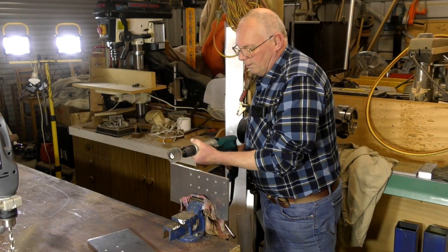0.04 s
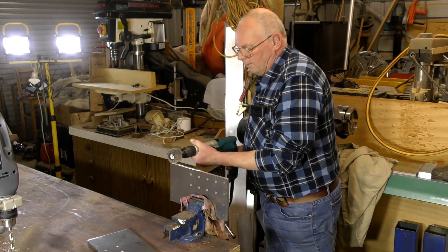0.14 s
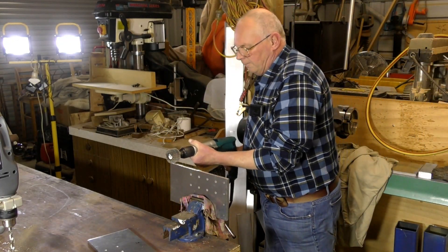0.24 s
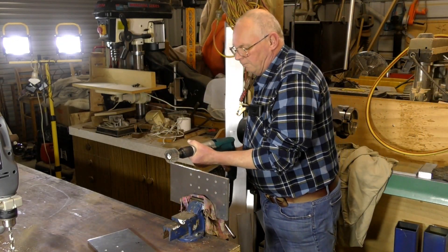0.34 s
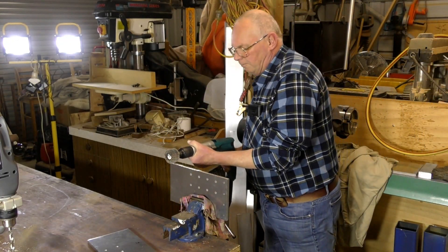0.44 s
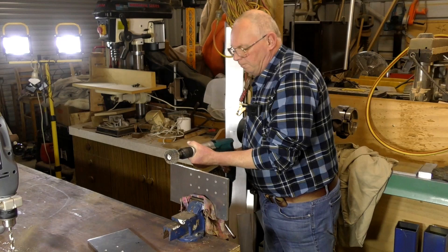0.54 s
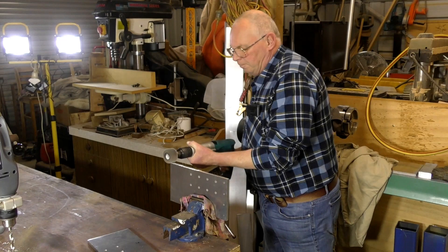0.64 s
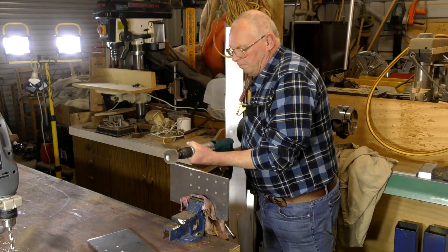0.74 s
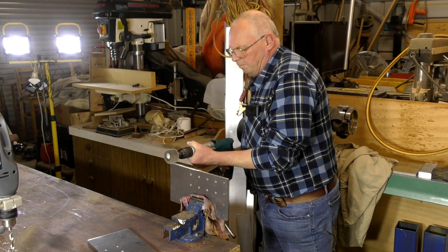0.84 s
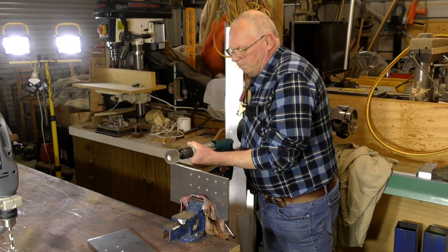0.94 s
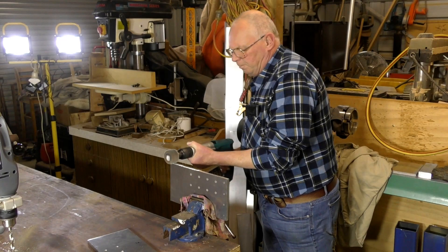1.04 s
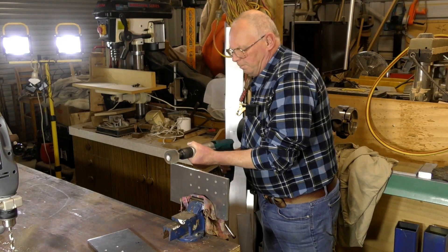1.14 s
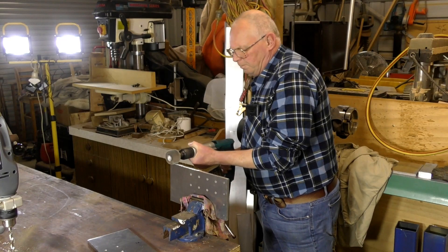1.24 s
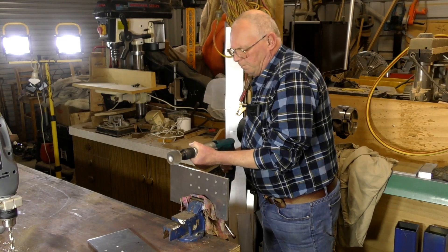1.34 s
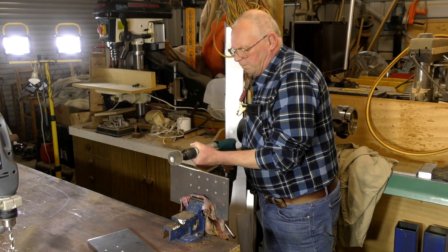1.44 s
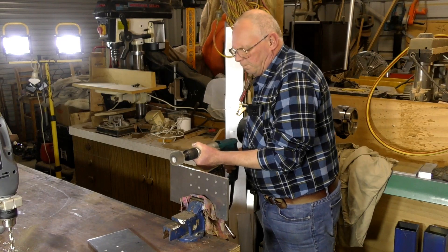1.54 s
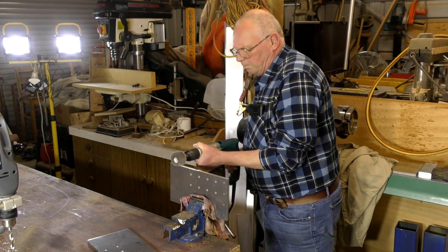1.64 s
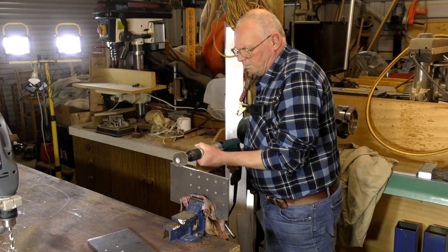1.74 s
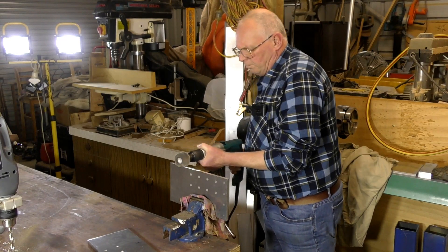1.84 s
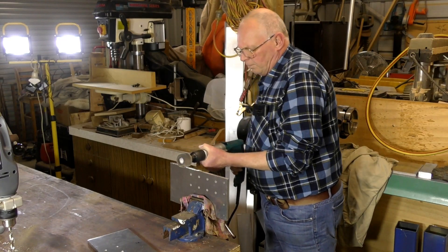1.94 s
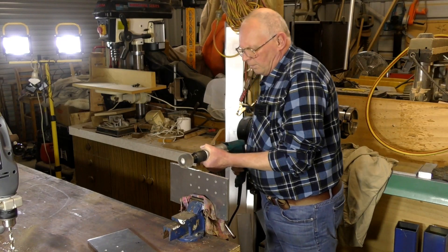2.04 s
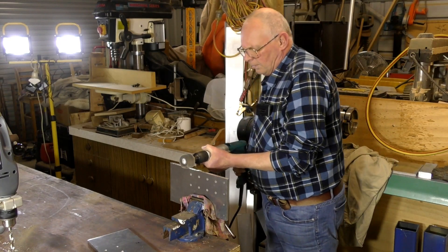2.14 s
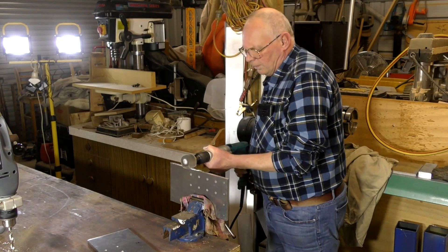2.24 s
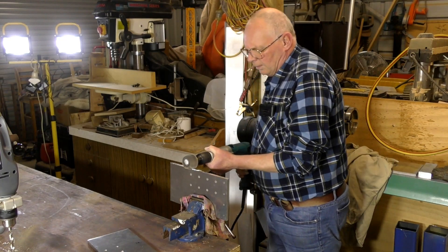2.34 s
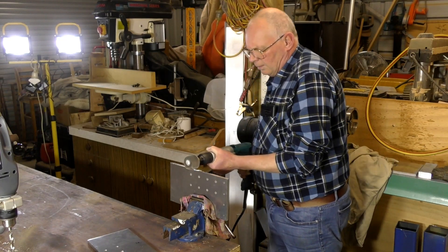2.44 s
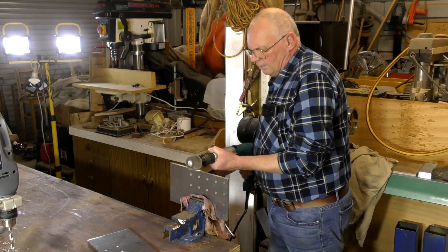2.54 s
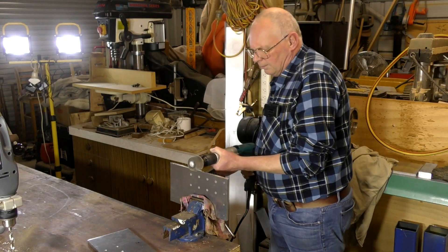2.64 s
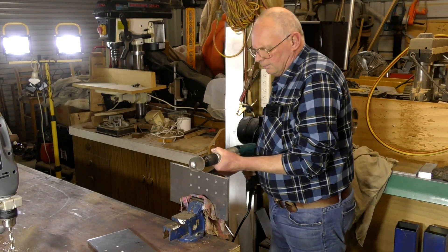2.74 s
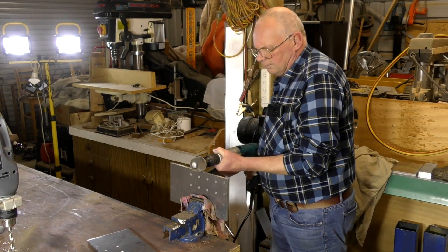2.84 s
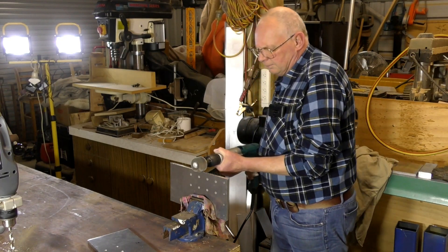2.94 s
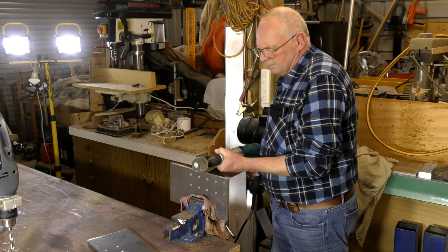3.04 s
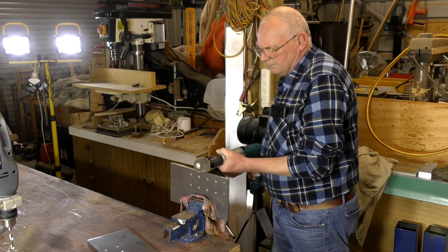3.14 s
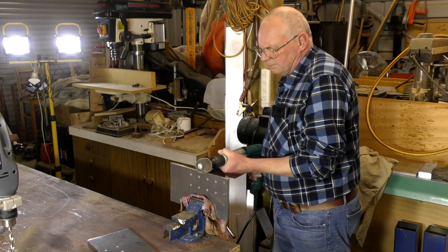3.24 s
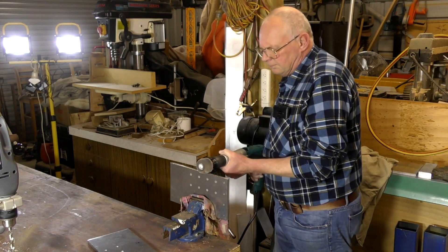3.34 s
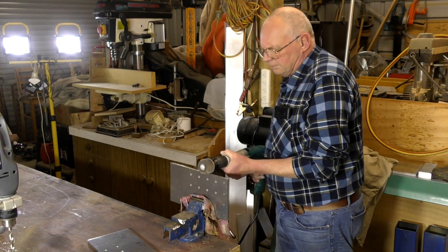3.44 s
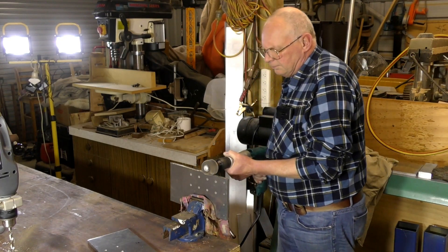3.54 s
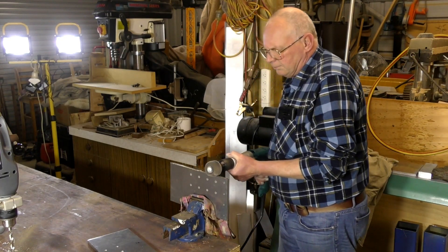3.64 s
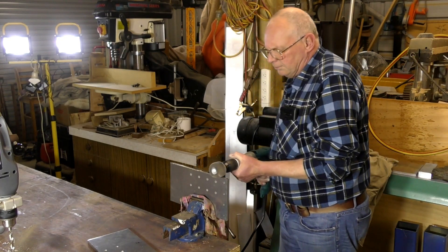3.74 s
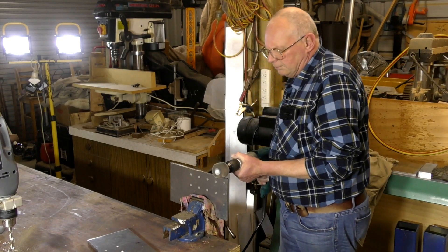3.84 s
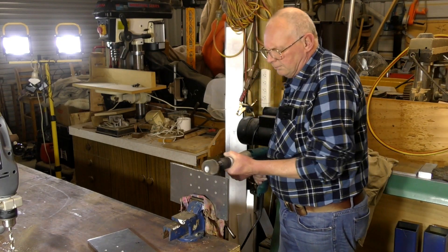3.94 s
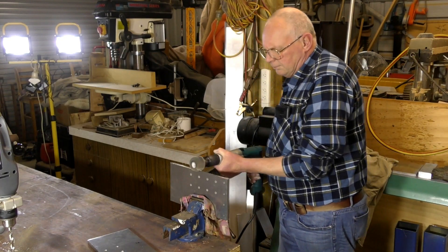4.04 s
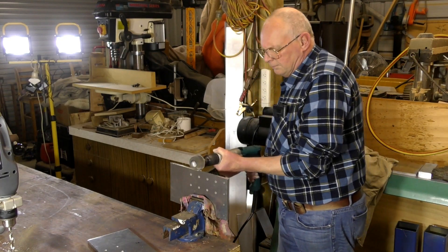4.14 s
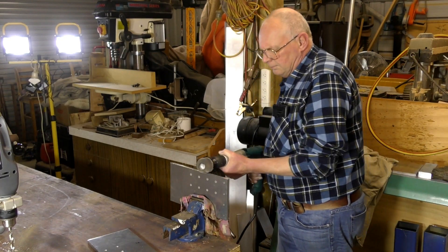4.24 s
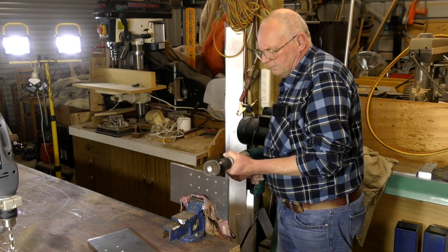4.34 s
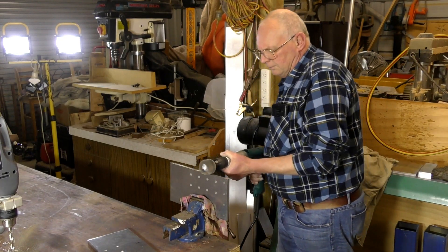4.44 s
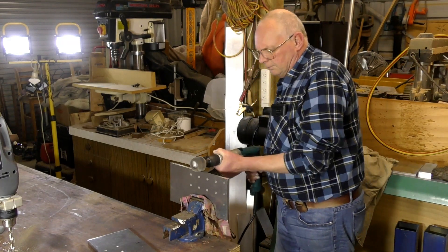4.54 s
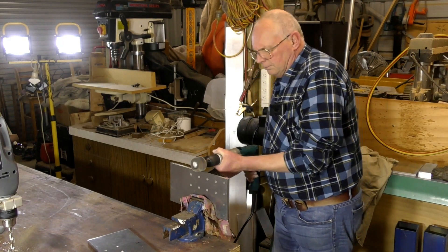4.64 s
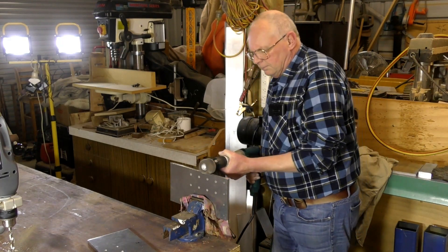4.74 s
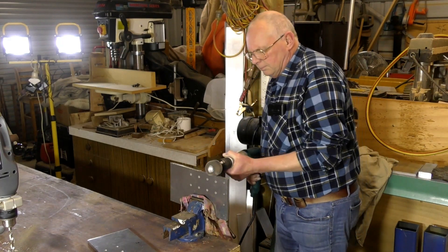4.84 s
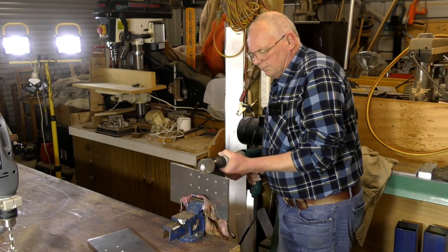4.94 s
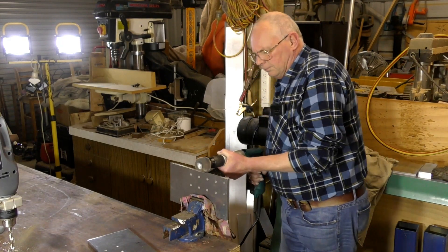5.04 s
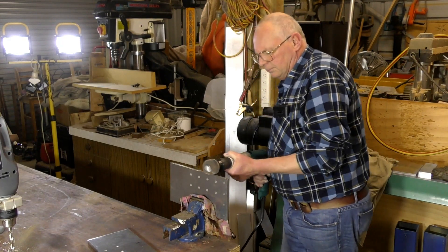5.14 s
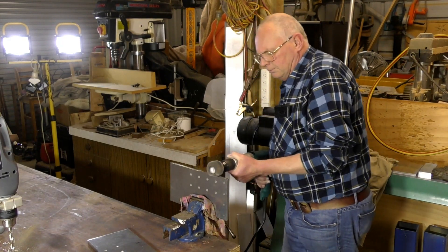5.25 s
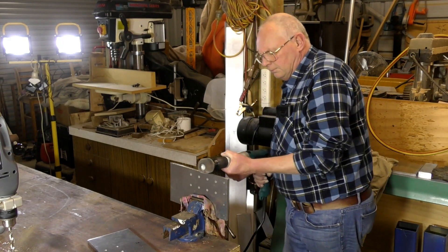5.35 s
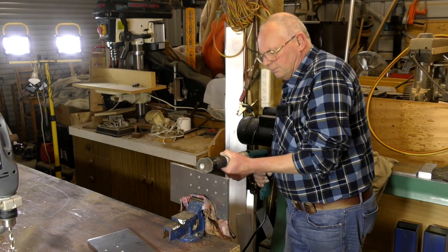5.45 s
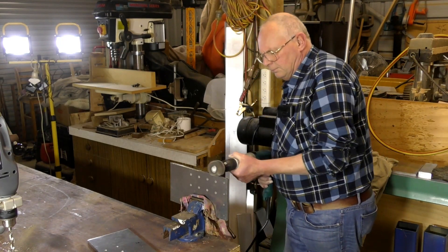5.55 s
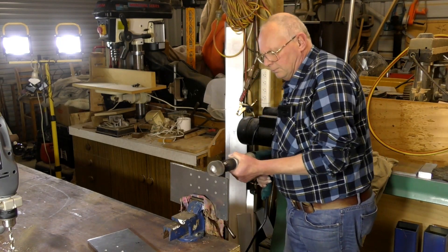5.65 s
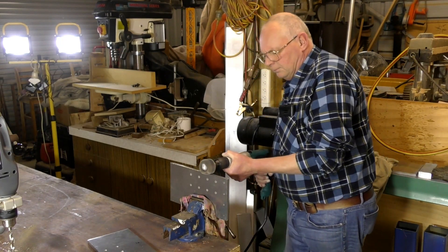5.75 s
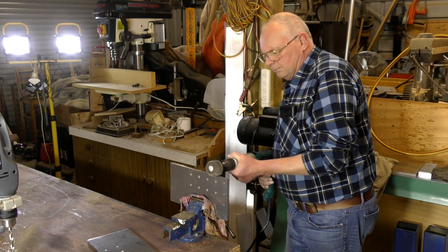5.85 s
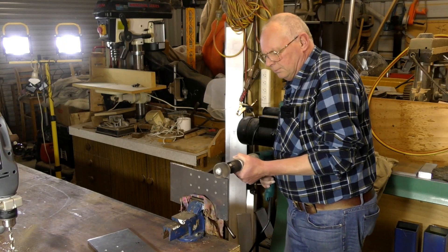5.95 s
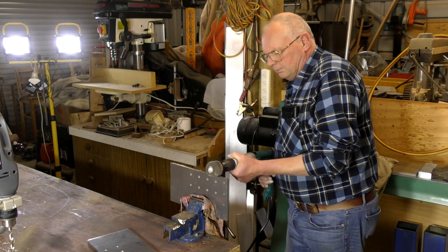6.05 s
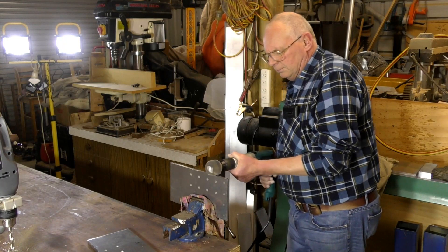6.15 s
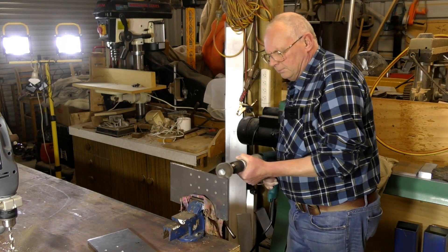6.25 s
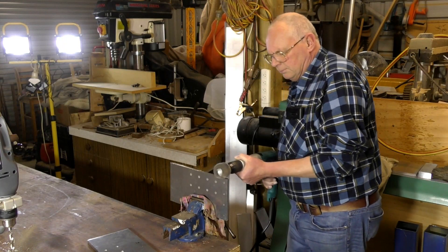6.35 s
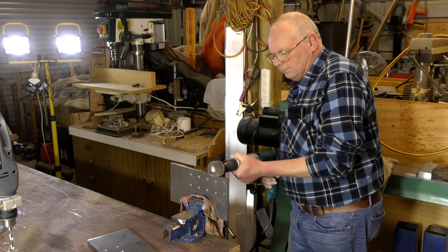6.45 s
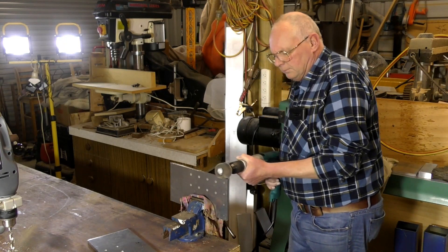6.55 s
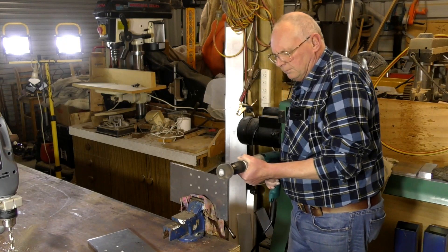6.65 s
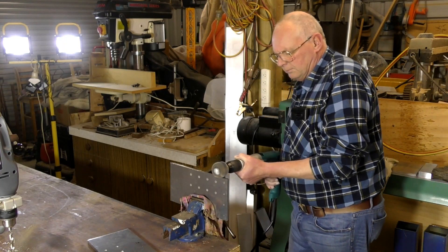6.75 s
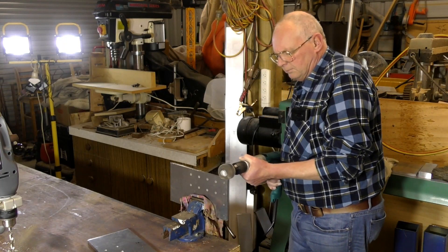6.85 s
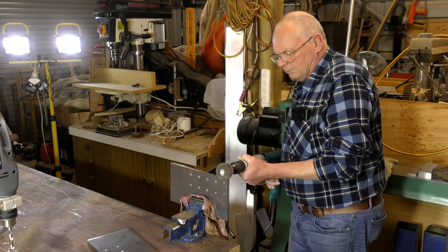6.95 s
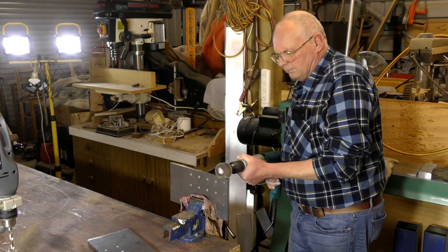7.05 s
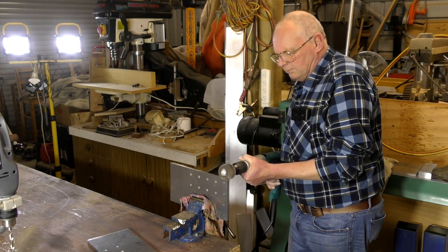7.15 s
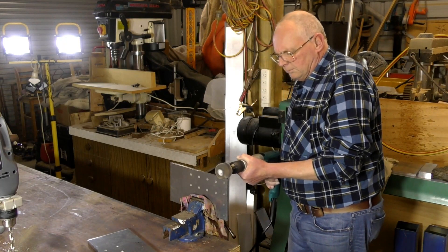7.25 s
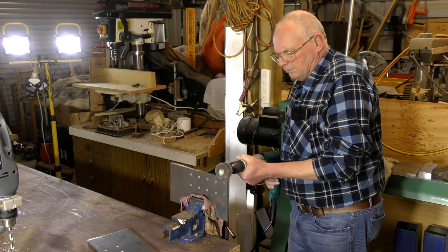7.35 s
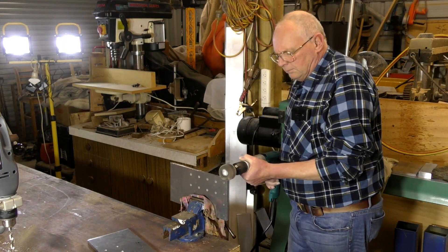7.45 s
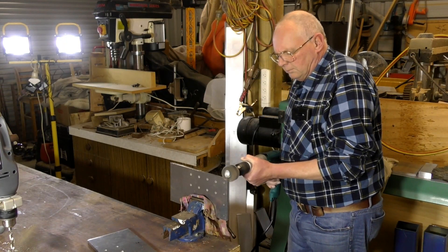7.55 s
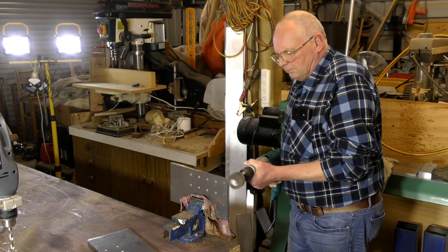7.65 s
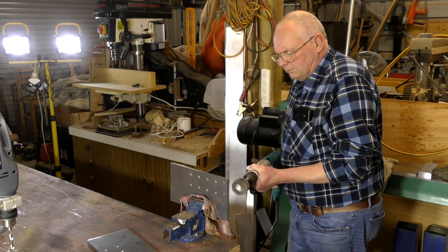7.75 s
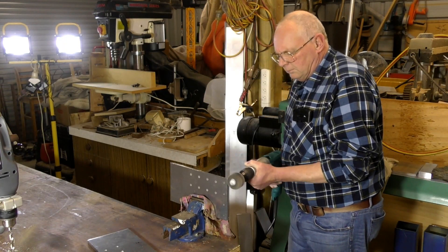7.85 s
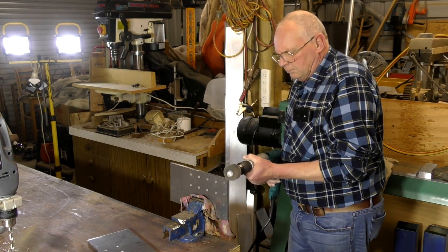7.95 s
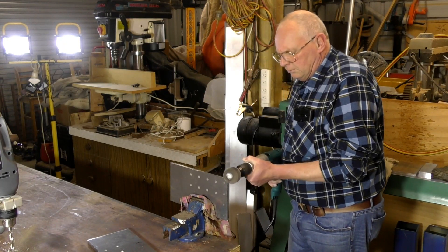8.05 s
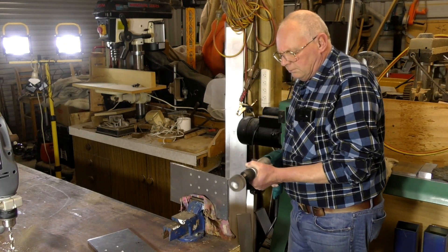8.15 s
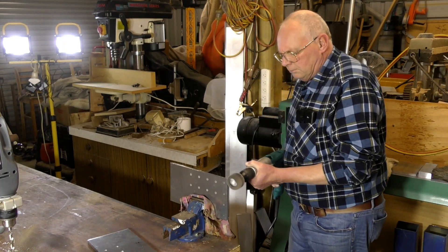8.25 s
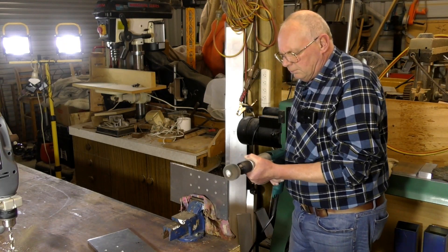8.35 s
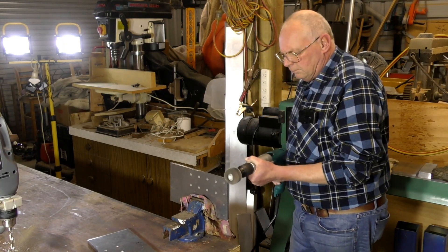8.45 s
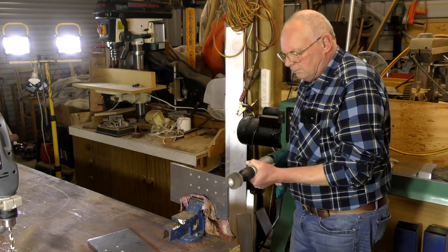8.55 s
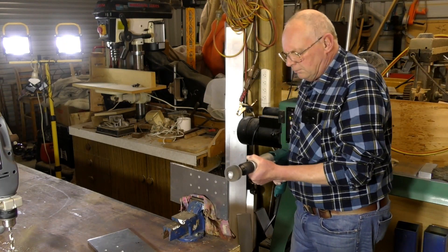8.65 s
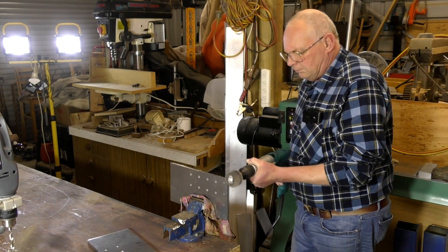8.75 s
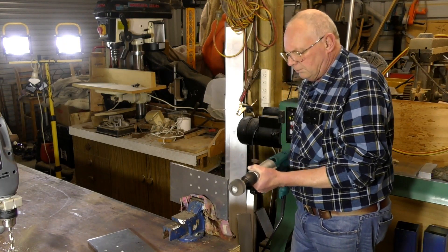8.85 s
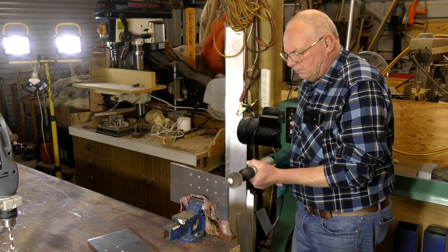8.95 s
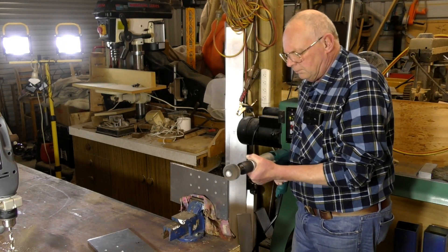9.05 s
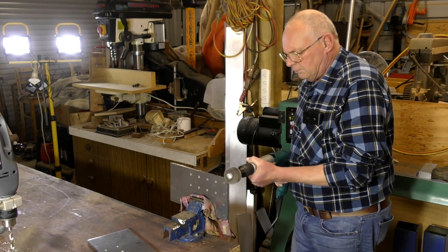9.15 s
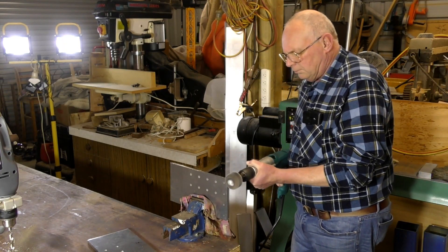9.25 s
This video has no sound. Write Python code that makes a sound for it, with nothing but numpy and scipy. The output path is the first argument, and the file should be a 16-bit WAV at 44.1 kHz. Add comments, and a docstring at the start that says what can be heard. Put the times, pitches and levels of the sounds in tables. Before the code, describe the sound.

Faint room noise and a quick cluster of plastic clicks lead into an electric drill running up. A spinning sanding pad scratches and buzzes against sheet metal, surging as it is pressed harder, while the motor keeps whining. Then the load eases, leaving a slightly higher, rattling drill and several brief metallic scrapes. A stereo microphone picks it up in a small workshop.

```python
"""A small workshop, heard through a mid-side microphone pair: a corded drill at work on sheet metal.
Over the room's hush the trigger clicks and the motor runs up; shaft, gear teeth and armature slots
whine at multiples of its speed. The grit of a spinning abrasive pad returns every turn, scraping and
ringing the plate. Near the end the pad only dabs the metal while the unloaded gears rattle."""
import sys
import numpy as np
from scipy import signal
from scipy.fft import rfft, irfft, next_fast_len
from scipy.io import wavfile
from scipy.ndimage import uniform_filter1d

SR = 44100
rng = np.random.default_rng(int(sys.argv[2]) if len(sys.argv) > 2 else 0)


def log_audio(samples):
    """Write samples as a 16-bit WAV file to the path given in sys.argv[1]."""
    # one column per channel
    frames = np.atleast_2d(samples).T
    # limit to full scale, then quantise
    limited = np.clip(frames, -1, 1)
    pcm = np.round(limited * 32767).astype(np.int16)
    wavfile.write(sys.argv[1], SR, pcm)


N = 409688
TIME = np.arange(N) / SR

# Room tone. Each row: frequency in Hz, relative density in dB.
HUSH_SPECTRUM = [(15, -37), (25, -14), (202, -11.5), (415, -14), (604, -30), (1240, -18), (7280, -38),
                 (15000, -39)]
# The hush sinks once the drill runs. Each row: time in seconds, level in dB.
HUSH_LEVEL = [(0, -41.5), (.1, -46.5), (.6, -44), (1.2, -53), (2.2, -55)]
# A faint tone in the room. Each row: pitch in Hz, level in dB.
ROOM_WHISTLES = [(3698, -66.5)]
# Stereo width at the microphone. Each row: frequency in Hz, side gain in dB.
SIDE_SPECTRUM = [(60, -5), (130, -6.5), (290, -19.5), (640, -13.5), (1410, -3.5), (3100, -7.5), (6820, -7),
                 (15000, -4.5)]
# Trigger, switch and gears taking up slack. Each row: start in seconds, peak in dB, pitch in Hz.
CLICKS = [(.476, -34.5, 2600), (.495, -34, 2510), (.637, -27, 2650), (.658, -18.5, 2680),
          (.684, -9.5, 3060), (0.717, -8.5, 2540), (0.731, -17, 3000), (0.748, -14, 3080)]
# Motor speed under load. Each row: time in seconds, turns a second.
LOADED_SPEED = [(2.01, 441.3), (2.27, 440.3), (3.06, 431.2), (3.72, 436.2), (4.25, 445.1), (4.51, 442.5),
                (4.73, 445.0), (4.91, 441.2), (5.2, 442.5), (5.32, 439.3), (5.56, 442.5), (5.69, 439.0),
                (5.86, 445.1), (6.01, 443.5), (6.26, 450.4), (6.4, 449.3), (6.57, 453.9), (6.71, 452.6),
                (6.85, 455.4), (7.02, 455.6), (7.15, 459.0), (7.28, 458.2), (7.43, 461.0), (7.66, 461.5),
                (7.9, 474.3), (8.35, 482.3), (8.99, 485.3), (9.28, 481.9)]
# How loud a shaft tone leaves the casing. Each row: pitch in Hz, level in dB.
CASING_RESPONSE = [(130, -65), (300, -41), (350, -74), (385, -37.5), (422, -49.5), (436, -41), (445, -43),
                   (461, -49.5), (480, -50), (600, -64), (770, -41), (845, -41), (870, -39), (965, -39)]
# Tone of the meshing teeth. Each row: time in seconds, relative level in dB.
MESH_LEVEL = [(0.9, -31), (1.08, -20), (1.18, -19), (1.28, -30), (1.36, -25), (1.44, -42), (1.54, -26),
              (1.66, -33.5), (1.8, -27), (2.2, -38), (2.3, -35), (2.54, -26.0), (2.64, -35), (2.84, -23),
              (3.32, -28.5), (3.38, -30), (3.66, -26.5), (3.84, -21), (3.96, -26.5), (4.12, -20.5),
              (4.32, -27), (4.4, -32.5), (4.64, -21.5), (4.78, -24.5), (4.84, -22), (5.02, -27),
              (5.14, -21.5), (5.44, -29), (5.5, -25), (5.72, -26), (5.8, -33.5), (5.88, -19.5),
              (6.0, -23.5), (6.14, -20), (6.4, -19.5), (6.48, -23), (6.7, -23.5), (6.8, -31), (6.9, -23),
              (7.0, -21), (7.12, -32), (7.24, -31), (7.28, -41), (7.36, -23), (7.48, -27), (7.7, -39),
              (8.4, -27.5), (9.24, -27)]
# The sideband just above it. Each row: time in seconds, relative level in dB.
SIDEBAND_LEVEL = [(.92, -37), (1, -33), (1.2, -40), (1.4, -29), (1.9, -42), (2.6, -40), (2.84, -35),
                  (3, -44), (3.8, -31.5), (3.95, -46), (4.28, -29.5), (4.75, -28.5), (5.5, -37), (6, -36),
                  (6.4, -43), (6.7, -33), (7.5, -32), (7.9, -56)]
# Weaker motor tones. Each row: multiple of motor speed, relative level in dB, dB per Hz of extra speed.
WEAK_TONES = [(2.679, -51, 0), (4, -47, -.5), (4.821, -49, .7), (5.358, -39, -.1), (5.64, -48, -.3),
              (6, -40, -.6), (7.2, -44, -.3), (8.69, -49, 0), (10, -45.5, -.3), (10.178, -49, -.3),
              (11.54, -47, -.2), (13.39, -44, 0), (15.23, -45, .1)]
# Tones of the pad settling. Each row: multiple of motor speed, relative level in dB.
SETTLING_TONES = [(13.39, -30), (14.4, -33)]
# Two rasping tones. Each row: time in seconds, relative levels of the lower and the upper in dB.
CHATTER_LEVELS = [(1, -40, -44), (1.45, -39, -36), (2.06, -27, -28.5), (2.4, -52, -38), (2.86, -35, -50),
                  (3.24, -52, -45), (5.66, -38, -48), (5.9, -34, -50), (6.4, -44, -46), (6.55, -26, -29),
                  (6.7, -37, -43), (6.85, -31, -34), (7.28, -33, -46), (7.5, -27, -50), (7.75, -45, -53)]
# The pad's imbalance. Each row: multiple of pad speed, relative level in dB.
IMBALANCE_TONES = [(2, -66), (3, -64), (5, -61), (7, -57), (9, -58)]
# Loose gears. Each row: frequency in Hz, relative density in dB.
RATTLE_SPECTRUM = [(60, -100), (200, -13), (330, -8.5), (560, -11), (780, -5), (950, 0), (1800, -2),
                   (3000, 0.5), (7000, -14.5), (13000, -16.5)]
# Resonances of the housing. Each row: centre in Hz, width in Hz, strength in dB.
HOUSING_MODES = [(1203, 62, -4.5), (1813, 240, -5)]
# Grit pattern that returns on the next turn. Each row: time in seconds, share from 0 to 1.
GRIT_REPEAT = [(1, .5), (1.5, .85), (4, .85), (5, .7), (7.5, .75), (7.9, .1)]
# Bands of grit buzz. Each row: multiple of motor speed, width in Hz, relative gain in dB.
BUZZ_BANDS = [(7.15, 320, 19), (7.9, 260, 18), (11.9, 290, 13)]
# Course of that buzz. Each row: time in seconds, level in dB.
BUZZ_LEVEL = [(.9, -45), (1.2, -14), (2, -18), (2.9, -21.5), (3.4, -39), (3.9, -23), (7.45, -19.5),
              (7.8, -34), (9.29, -36)]
# Steady pressure on the pad. Each row: time in seconds, relative scrape level in dB.
PAD_PRESSURE = [(.655, -28), (.7, -16.5), (.76, -21.5), (1.04, -20.5), (1.4, -25), (2.2, -19), (3.83, -22),
                (4.3, -23.5), (5.05, -21), (5.82, -24), (7.6, -26.5), (7.75, -31), (9.24, -26.5)]
# The hand leans in. Each row: time of the peak in seconds, extra pressure in dB.
LEANS = [(1.3, 4.5), (1.75, 3), (4.38, 4.5), (4.78, 3.5), (5.65, 5), (5.96, 5), (6.3, 5), (6.64, 6.5),
         (6.98, 7), (7.25, 6.5), (7.57, 10.5)]
# Brief touches of the pad. Each row: time of the peak in seconds, pressure in dB, rise in seconds,
# pitch at which the plate answers in Hz, ringing gain in dB.
DABS = [(7.986, -17, 0.017, 2250, 13), (8.15, -22, .021, 3700, 14), (8.4, -21, 0.022, 4600, 13),
        (8.53, -24.5, 0.028, 3780, 23), (8.675, -21.5, 0.022, 3500, 20), (9.044, -20, 0.018, 3700, 16),
        (9.196, -18.5, 0.013, 3700, 18), (9.28, -28, 0.017, 3020, 20)]
# Dry scrape of grit on metal. Each row: frequency in Hz, relative density in dB.
SCRAPE_SPECTRUM = [(300, -16.5), (900, -33), (2000, 1), (5000, 3.5), (7000, -0.5), (9500, 4.5), (11500, 7),
                   (13000, -1.5), (16000, -14)]
# Resonances of the rubbed plate. Each row: centre in Hz, width in Hz, strength in dB.
RUBBED_PLATE_MODES = [(5580, 110, 6.5), (6340, 590, 10), (6600, 1550, 13.5), (8490, 140, 11),
                      (9100, 200, 5)]
# Resonances of the free plate. Each row: centre in Hz, width in Hz, gain in dB.
FREE_PLATE_MODES = [(2370, 280, 3), (3450, 330, -1), (3800, 330, 2.5), (4750, 400, 1)]

MESH, SIDEBAND, SLOTS, FAN, CHATTER = 5, 5.179, 12, 37, (7.4, 7.86)  # multiples of motor speed
USUAL_HZ, WANDER_HZ, MOTOR_PER_PAD = 442, .35, 10.82
START_S, QUICK_S, SLOW_S, QUICK_SHARE = .642, .073, .22, .588  # run-up
TOUCH_S, TOUCH_RAMP_S, SEATING_S, SEATED_S = .93, .54, .98, 2.14
RATTLE_DB, RATTLE_DB_PER_HZ, RATTLE_REF_HZ, UNSEATED_DB = -32.5, .1826, 435.5, 9.5
LEAN_WIDTH_S, DRY_LEAN_SHARE, SLIP_TURNS = .073, .7, .0007
DAB_FALL_PER_RISE, DAB_REACH_OCTAVES = 1.26, .3
CUTOFF_HZ = 15730


def gain_of(db):
    """Decibels as amplitude."""
    return 10 ** (np.asarray(db) / 20)


def unit_rms(x):
    """x scaled to an rms of 1."""
    return x / np.sqrt(np.mean(x ** 2) + 1e-20)


def db_at(spectrum, hz):
    """A spectrum's level at hz, on a log frequency axis."""
    f, db = np.transpose(spectrum)
    return np.interp(np.log(hz + 1), np.log(f + 1), db)


def curves(rows):
    """Each value column of a table as a curve in time."""
    s, *values = np.transpose(rows)
    return [np.interp(TIME, s, column) for column in values]


def coloured(x, spectrum, modes=()):
    """Shapes x by a spectrum, lifted around each resonance."""
    size = next_fast_len(x.shape[-1])
    hz = np.fft.rfftfreq(size, 1 / SR)
    lift = 1 + sum(gain_of(db) / np.hypot(1, 2 * (hz - f) / width) ** 2 for f, width, db in modes)
    return irfft(rfft(x, size) * gain_of(db_at(spectrum, hz)) * lift, size)[..., :x.shape[-1]]


def resonate(x, hz, width_hz):
    """A resonance that can glide: shifts hz down to zero, smooths twice, and shifts back."""
    carrier = np.exp(2j * np.pi * np.cumsum(hz * np.ones(N)) / SR)
    pole = np.exp(-np.pi * width_hz / SR)
    smooth = signal.lfilter([(1 - pole) ** 2], [1, -2 * pole, pole ** 2], x / carrier)
    return (carrier * smooth).real


def drift(top_hz):
    """Slow random wander of rms 1."""
    t = TIME[::256]
    rates = np.geomspace(top_hz / 8, top_hz, num=12)
    slow = sum(np.sin(2 * np.pi * (f * t + rng.random())) / np.sqrt(f) for f in rates)
    return np.interp(TIME, t, unit_rms(slow))


def flicker(samples):
    """Fast random wander of rms 1."""
    return unit_rms(uniform_filter1d(rng.standard_normal(N), size=samples))


def tone(cycles, hz, db, waver_db):
    """A wavering tone as (mid, side); the walls give the side a wandering phase."""
    phase = 2 * np.pi * (cycles + rng.random())
    amplitude = np.sqrt(2) * gain_of(db + waver_db * drift(9))
    side_phase = phase + 2 * np.pi * rng.random() + 3 * drift(2.06)
    side = gain_of(db_at(SIDE_SPECTRUM, hz) - 3.5) * np.sin(side_phase)
    return amplitude * np.array([np.sin(phase), side])


def room_tone():
    """The workshop behind the drill: low noise and a faint whistle."""
    mid, side = unit_rms(coloured(rng.standard_normal((2, N)), HUSH_SPECTRUM))
    whistle = sum(tone(hz * TIME, hz, db, 2.5) for hz, db in ROOM_WHISTLES)
    return gain_of(curves(HUSH_LEVEL)[0]) * np.array([mid, coloured(side, SIDE_SPECTRUM)]) + whistle


def trigger():
    """Short knocks ring the plastic housing, a little left of the microphone's axis."""
    out, t = np.zeros(N), TIME[:1500]
    for s, db, hz in CLICKS:
        snap = rng.standard_normal(len(t)) * gain_of(-60 * t / .25) * np.clip(t / .00089, 0, 1)
        snap = coloured(snap, [(hz / 4.5, -30), (hz / 1.04, -6), (hz, 0), (hz * 1.1, -6), (hz * 2.6, -36)])
        out[round(s * SR):][:len(t)] += gain_of(db) * snap / abs(snap).max()
    return np.array([out, .16 * out])


def motor_speed():
    """Turns a second: a quick and a slow stage close the gap to the loaded speed."""
    t = np.maximum(TIME - START_S, 0)
    gap = QUICK_SHARE * np.exp(-t / QUICK_S) + (1 - QUICK_SHARE) * np.exp(-t / SLOW_S)
    return curves(LOADED_SPEED)[0] * (1 - gap)


def touching():
    """Rises from 0 to 1 as the pad meets the plate."""
    return np.clip((TIME - TOUCH_S) / TOUCH_RAMP_S, 0, 1)


def unseated():
    """1 until the pad starts to settle, 0 once it sits flat."""
    return np.clip((SEATED_S - TIME) / (SEATED_S - SEATING_S), 0, 1)


def dab_pressures():
    """One bell-shaped pressure curve for each brief touch."""
    return np.array([
        gain_of(db) * np.exp(-((TIME - s) / (rise * np.where(TIME < s, 1, DAB_FALL_PER_RISE))) ** 2)
        for s, db, rise, *_ in DABS])


def shaft_hum(hz, turns):
    """The shaft's first two harmonics, heard through the casing."""
    return sum(tone(k * turns, k * hz, db_at(CASING_RESPONSE, k * hz), waver_db)
               for k, waver_db in ((1, 1.27), (2, 2)))


def gear_whine(hz, turns):
    """Meshing teeth sing near full speed and stutter until the pad is seated."""
    bite = np.clip(hz / 392, 0, 1) ** 9
    bite *= 1 + 16 * dab_pressures().sum(0)  # a touch loads the teeth
    bite *= 1 + .45 * unseated() * flicker(300)
    flutter = 1 + .35 * np.cos(2 * np.pi * (SIDEBAND - MESH) * turns)  # the big wheel runs out of true
    mesh = tone(MESH * turns, MESH * hz, curves(MESH_LEVEL)[0], waver_db=1)
    sideband = tone(SIDEBAND * turns, SIDEBAND * hz, curves(SIDEBAND_LEVEL)[0], waver_db=2.5)
    return bite * (flutter * mesh + sideband)


def slot_whine(hz, turns):
    """Armature slots whine with the current, which is high while the motor gains speed."""
    # the magnetic pull throbs once a turn and stutters as the brushes spark
    pull = unit_rms(1 + .4 * np.sin(2 * np.pi * turns) + 1.1 * flicker(120))
    gaining = uniform_filter1d(np.gradient(motor_speed()) * SR, size=2000) ** 6
    current = .08 + .12 * touching() * unseated() + gaining / (gaining + 250. ** 6)
    current *= np.clip(hz / 205, 0, 1) ** 5
    whine = pull * tone(SLOTS * turns, SLOTS * hz, -22.5, waver_db=3)
    sparks = unit_rms(resonate(rng.standard_normal((2, N)), 11.5 * hz, width_hz=330))
    return current * (whine + gain_of([[-25], [-33]]) * sparks)


def drill_tones(hz, turns):
    """All tones locked to the motor; steady contact strengthens the weak ones and the pad's thump."""
    whine = shaft_hum(hz, turns) + gear_whine(hz, turns) + slot_whine(hz, turns)
    run_up = (hz / hz.max()) ** 3
    pad_turns = turns / MOTOR_PER_PAD
    contact = curves(GRIT_REPEAT)[0]
    fan = tone(FAN * turns, FAN * hz, -36, waver_db=4)
    eased_hz = np.clip(hz - USUAL_HZ, 0, 22)  # speed gained as the load eases
    weak = sum(tone(k * turns, k * hz, db + slope * eased_hz, 2.4) for k, db, slope in WEAK_TONES)
    weak *= .5 + 1.75 * contact
    settling = sum(tone(k * turns, k * hz, db, 4) for k, db in SETTLING_TONES)
    settling *= touching() ** 2 * unseated()
    chatter = sum(tone(k * turns, k * hz, db, 1) for k, db in zip(CHATTER, curves(CHATTER_LEVELS)))
    chatter *= 1 + .55 * np.sin(2 * np.pi * pad_turns)
    thump = sum(tone(k * pad_turns, k * hz / MOTOR_PER_PAD, db, 4.5) for k, db in IMBALANCE_TONES)
    return whine + settling + run_up * (fan + weak + chatter + 1.18 * contact * thump)


def gear_rattle(hz, shaking):
    """Loose gears shake the housing, more before the pad is seated and as the load eases."""
    loaded_hz = curves(LOADED_SPEED)[0]
    db = RATTLE_DB + RATTLE_DB_PER_HZ * (loaded_hz - RATTLE_REF_HZ) + UNSEATED_DB * unseated()
    rattle = unit_rms(coloured(shaking, RATTLE_SPECTRUM, HOUSING_MODES))
    return rattle * gain_of(db) * (hz / loaded_hz) ** 1.25


def grit_pattern(pad_turns, points=1000):
    """A random pattern round the pad, partly renewed each turn as it slides to fresh metal."""
    laps = rng.standard_normal((int(pad_turns[-1]) + 2, 2, points))
    lap_starts = np.searchsorted(pad_turns, np.arange(len(laps))).clip(0, N - 1)
    kept = np.clip(curves(GRIT_REPEAT)[0][lap_starts], 0, .95)
    for k in range(1, len(laps)):
        laps[k] = kept[k] * laps[k - 1] + np.sqrt(1 - kept[k] ** 2) * laps[k]
    tracks = signal.resample_poly(laps.transpose(1, 0, 2).reshape(2, -1), 4, 1, axis=1)
    return np.array([np.interp(pad_turns * points * 4, np.arange(len(track)), track) for track in tracks])


def grit_buzz(hz, pattern):
    """The returning grit buzzes in bands that follow the motor speed."""
    buzz = unit_rms(sum(gain_of(db) * resonate(pattern, k * hz, width) for k, width, db in BUZZ_BANDS))
    return buzz * gain_of(curves(BUZZ_LEVEL)[0] + 1.9 * drift(13))


def plate_ring(grains):
    """Each dab rings the free plate's modes near its own pitch."""
    pitch_hz, ring_db = np.transpose(DABS)[3:]
    touches = dab_pressures() * gain_of(ring_db)[:, None]
    out = np.zeros((2, N))
    for hz, width, db in FREE_PLATE_MODES:
        nearness = np.exp(-(np.log2(hz / pitch_hz) / DAB_REACH_OCTAVES) ** 2)
        out += gain_of(db) * resonate(grains * (nearness @ touches), hz, width)
    return out


def patchy(x, depth_db):
    """Bands swell and fade on their own as the pad wanders over the plate."""
    bands = signal.stft(x, nperseg=512)[2]
    patches = uniform_filter1d(rng.standard_normal(bands.shape[1:]), size=4, axis=0)
    patches = unit_rms(uniform_filter1d(patches, size=24, axis=1))
    return signal.istft(bands * gain_of(depth_db * patches), nperseg=512)[1][:, :N]


def plate_scrape(roughness, running):
    """Grit scrapes the metal; leaning in lifts the plate's resonances more than the dry scrape."""
    lean_db = sum(db * np.exp(-((TIME - s) / LEAN_WIDTH_S) ** 2) for s, db in LEANS)
    pressure = gain_of(curves(PAD_PRESSURE)[0] + drift(20)) * running
    touches = dab_pressures().sum(0)
    bare = coloured(roughness, SCRAPE_SPECTRUM)
    full = coloured(roughness, SCRAPE_SPECTRUM, RUBBED_PLATE_MODES)
    scrape = bare * (pressure * gain_of(DRY_LEAN_SHARE * lean_db) + touches)
    ring = (full - bare) * touching() * (pressure * gain_of(lean_db) + 1.04 * touches)
    return patchy(scrape + ring, depth_db=1.2) / full.std()


def sanding(hz, turns):
    """The pad's grit and loose grains work the plate; the gears rattle under it."""
    running = np.clip((TIME - PAD_PRESSURE[0][0]) / .019, 0, 1)
    slip = SLIP_TURNS * (3 + drift(25))  # the soft pad lags and catches up
    pattern = grit_pattern(np.maximum.accumulate(turns / MOTOR_PER_PAD + slip))
    steady = .9 * np.clip(hz / 430, 0, 1) ** 6  # a slow pad has no steady pattern yet
    grains = unit_rms(rng.standard_normal((2, N)) * gain_of(2 * flicker(60)))
    roughness = steady * pattern + np.sqrt(1 - steady ** 2) * grains
    scrape = plate_scrape(roughness, running)
    rattle = gear_rattle(hz, 1.3 * roughness + .7 * grains)
    mid, side = scrape + running * (rattle + grit_buzz(hz, pattern)) + plate_ring(grains)
    return np.array([mid, coloured(side, SIDE_SPECTRUM)])


def scene():
    """All sources meet at the microphone as mid and side, decoded to left and right."""
    hz = motor_speed() * (1 + WANDER_HZ / USUAL_HZ * drift(14))
    turns = np.cumsum(hz) / SR
    mid, side = drill_tones(hz, turns) * (TIME > START_S) + sanding(hz, turns) + trigger() + room_tone()
    return np.array([mid + side, mid - side])


def record(dry):
    """A steep low-pass after the microphone takes off the highest treble."""
    low_pass = signal.firwin(2047, CUTOFF_HZ, window=("kaiser", 9), fs=SR)
    return signal.oaconvolve(dry, low_pass[None], "same")


dry = scene()
out = record(dry)
log_audio(out)
```